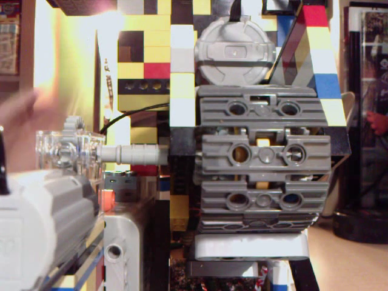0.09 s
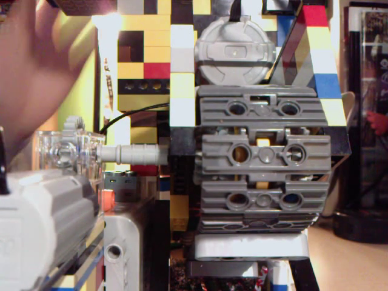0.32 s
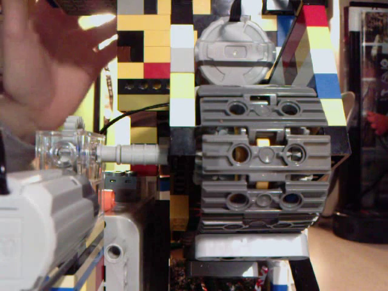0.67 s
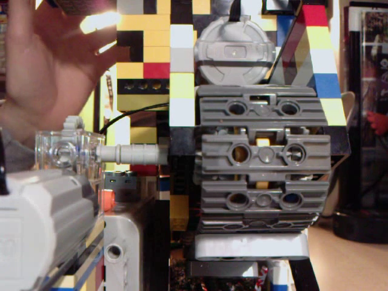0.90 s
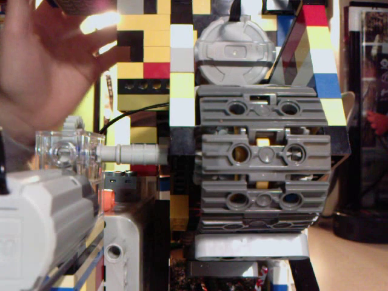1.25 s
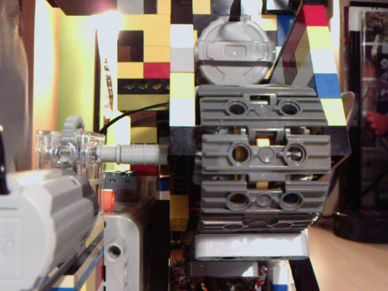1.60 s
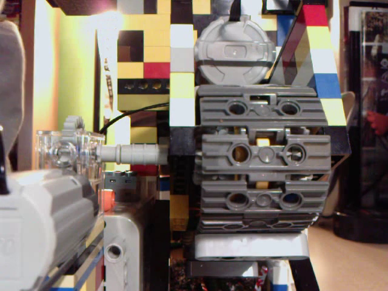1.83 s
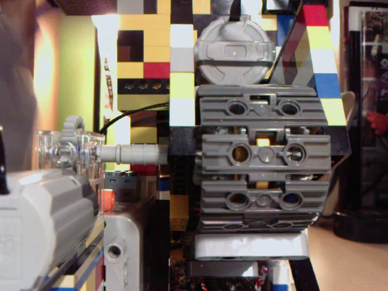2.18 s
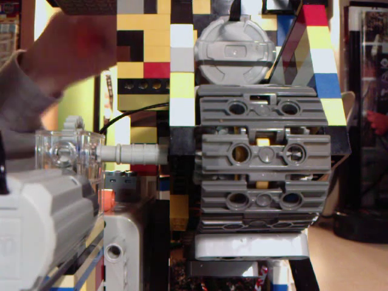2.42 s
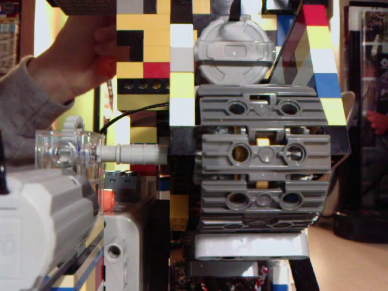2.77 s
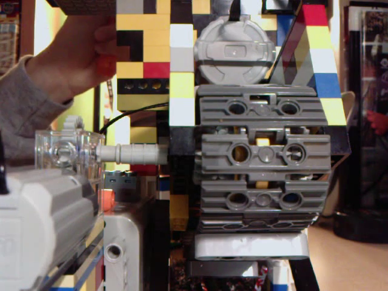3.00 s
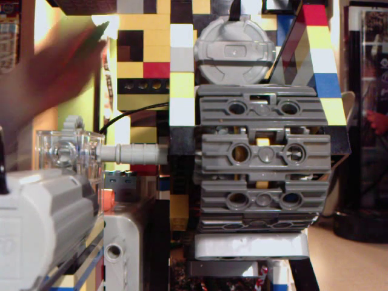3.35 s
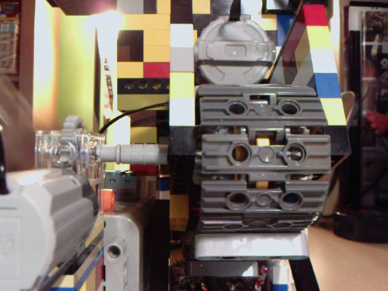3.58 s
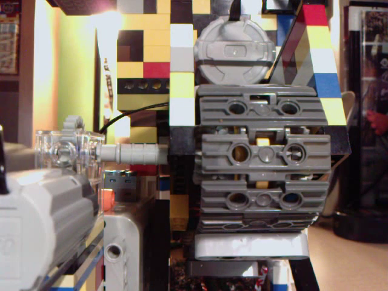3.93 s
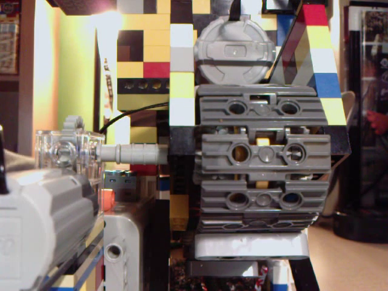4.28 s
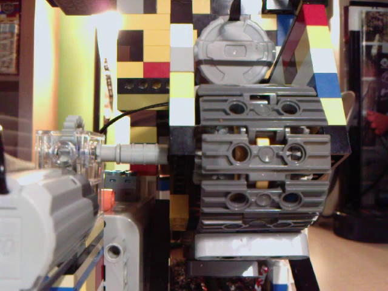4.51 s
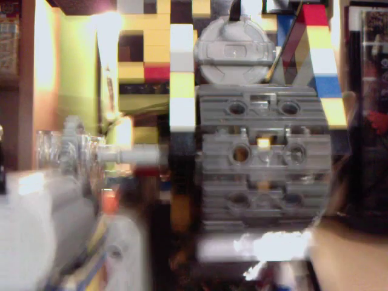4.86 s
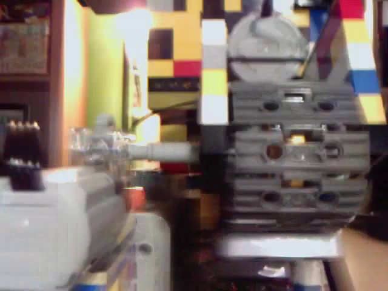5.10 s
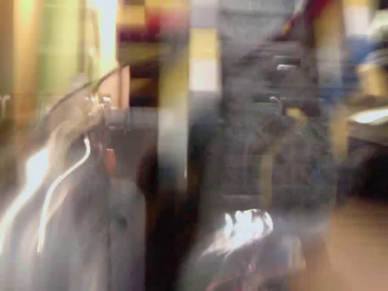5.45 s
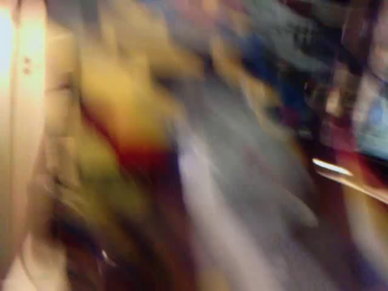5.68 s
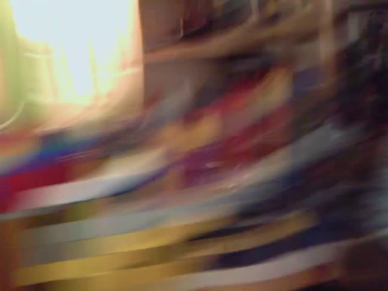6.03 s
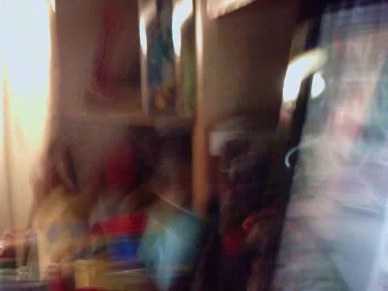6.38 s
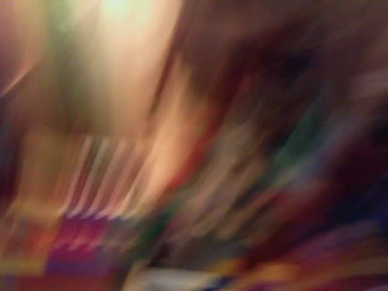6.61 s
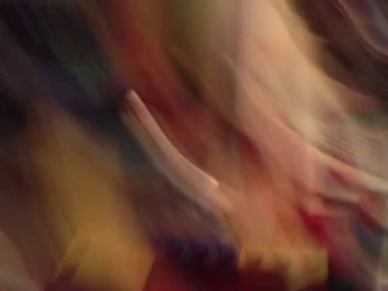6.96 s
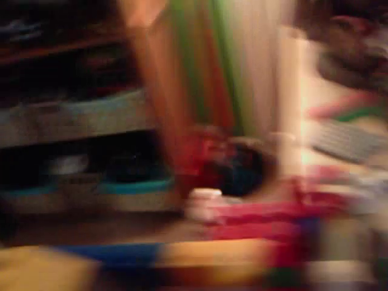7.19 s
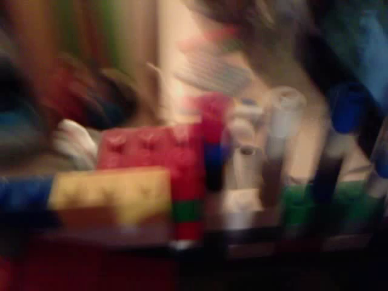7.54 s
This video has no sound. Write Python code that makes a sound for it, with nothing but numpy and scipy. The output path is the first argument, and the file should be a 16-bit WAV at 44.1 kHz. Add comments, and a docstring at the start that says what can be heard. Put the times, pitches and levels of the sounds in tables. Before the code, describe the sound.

Plastic toy bricks click and squeak, a small part drops, then comes loud clattering microphone handling, over a faint indoor hum.

```python
"""Handling a toy brick machine

The microphone sits in a model of plastic bricks. Fingers tap and bump the frame, joints slide and
squeak, and a loose part drops and rattles. Then the microphone is pulled out of its brick mount in an
overloading clatter and carried off. Behind it: mains hum, a thin whine and dull knocks in a small room."""
import sys
import numpy as np
from scipy import signal
from scipy.fft import rfft, irfft
from scipy.io import wavfile

SR = 44100
rng = np.random.default_rng(int(sys.argv[2]) if len(sys.argv) > 2 else 0)


def unload_audio(sound):
    """Save the sound as a 16-bit wav file, at the path given as the first command line argument."""
    columns = np.transpose(np.atleast_2d(sound))
    # keep every value between -1 and 1, then stretch to whole-number steps
    steps = np.round(np.clip(columns, -1, 1) * 32767)
    wavfile.write(sys.argv[1], SR, steps.astype(np.int16))


N = 342650
TIME = np.arange(N) / SR
HIT_TIME = TIME[:SR // 5]


def amp(db):
    """Decibels to gain."""
    return 10 ** (np.asarray(db) / 20)


def unit(x):
    """Scale to rms 1."""
    return x / np.sqrt(np.mean(x ** 2))


def fade(t, t60_s):
    """Exponential decay, 60 dB down after t60_s."""
    return np.exp(-np.log(1000) * t / t60_s)


def add(track, start_s, sound):
    """Mix a sound in at start_s."""
    i = max(int(start_s * SR), 0)
    track[i:i + len(sound)] += sound[:N - i]


def band(x, hz, kind, order=3):
    """Butterworth filter."""
    return signal.sosfilt(signal.butter(order, hz, kind, fs=SR, output="sos"), x)


def coloured_noise(samples, spectrum):
    """Noise of rms 1, shaped by (freq_hz, level_db) rows."""
    hz, db = np.transpose(spectrum)
    bins_hz = np.maximum(np.fft.rfftfreq(samples, 1 / SR), 1)
    gain = amp(np.interp(np.log(bins_hz), np.log(hz), db))
    return unit(irfft(rfft(rng.standard_normal(samples)) * gain, samples))


def walk(rate_hz):
    """Random wander with a spread near 1."""
    return np.interp(TIME * rate_hz, np.arange(1000), rng.standard_normal(1000))


def burst(band_hz, t60_s, order=2):
    """A dying band of noise."""
    return band(rng.standard_normal(len(HIT_TIME)), band_hz, "band", order) * fade(HIT_TIME, t60_s)


def stroke(start_s, length_s, attack_s, release_t60_s):
    """Envelope of a hand movement: rise, hold, decay."""
    attack = np.clip((TIME - start_s) / attack_s, 0, 1)
    return attack * fade(np.maximum(TIME - start_s - length_s, 0), release_t60_s)


def slips(per_s, spread_db):
    """Stick-slip: a random train of tiny jerks of wandering strength."""
    jerks = (rng.random(N) < per_s / SR) * rng.uniform(-0.9, 1, N)
    return jerks * amp(spread_db * np.tanh(walk(90)))


def ring(modes, scatter):
    """Struck modes; each point of contact weights and detunes them anew."""
    hz, db, t60_s = np.transpose(modes)[:, :, None]
    detune, weight, phase = rng.standard_normal((3, len(modes), 1))
    waves = np.sin(2 * np.pi * hz * (1 + scatter * detune) * HIT_TIME + np.pi * phase)
    return np.sum(amp(db + 2.3 * weight) * fade(HIT_TIME, t60_s) * waves, axis=0)


def strike(sound, body_db, shell_rel_db, crack_rel_db):
    """Set a blow's three band levels over its first 10 ms: hard corners are bright, flat faces dull."""
    body = band(sound, 2100, "low", order=5)
    shell = band(sound, [2200, 6200], "band", order=5)
    crack = band(sound, 6700, "high", order=5)
    parts = [(body, 0), (shell, shell_rel_db), (crack, crack_rel_db)]
    return sum(part * amp(body_db + rel_db) / np.std(part[:SR // 100]) for part, rel_db in parts)


def room(x, t60_s=0.16, damp_hz=3100):
    """Diffuse echo of a small furnished room, of unit energy."""
    t = TIME[:SR * 3 // 4]
    noise = band(rng.standard_normal(len(t)), damp_hz, "low", order=1)
    tail = noise * fade(t, t60_s) * (1 - fade(t, 0.034))
    return signal.fftconvolve(x, tail / np.linalg.norm(tail))[:N]


# Room noise spectrum: freq_hz, density_rel_db
AIR_SPECTRUM = [(25, 1), (90, 1.5), (150, -3), (300, -4.5), (400, -3), (520, -3.5), (680, -12.5),
                (900, -10), (1350, -11), (2050, -19.5), (2500, -22), (2900, -15), (3500, -24.5),
                (16000, -31)]


def room_air(level_db=-43):
    """Steady, dull noise of the room."""
    return amp(level_db) * coloured_noise(N, AIR_SPECTRUM)


# Hum tones: pitch_hz, rms_db
HUM_TONES = [(119.8, -47.5), (367, -54), (532, -57.5)]


def mains_hum(waver_hz=0.56, waver_db=0.59):
    """Three tones, wavering slightly in pitch and level."""
    out = np.zeros(N)
    for pitch_hz, rms_db in HUM_TONES:
        gain = amp(rms_db + waver_db * walk(7.5))
        phase = 2 * np.pi * np.cumsum(pitch_hz + waver_hz * walk(7.7)) / SR
        out += gain * unit(np.sin(phase))
    return out


def whine(pitch_hz=12796, pulse_hz=8.55):
    """Thin, pulsing tone of the electronics."""
    pulsing = np.clip(0.5 + np.sin(2 * np.pi * pulse_hz * TIME), 0, 1)
    level_db = np.interp(TIME, [0, 5.5, 6.1, 7.77], [-74, -72, -66, -68])
    return amp(level_db) * unit(pulsing * np.sin(2 * np.pi * pitch_hz * TIME))


# Distant scuffs and knocks: start_s, level_db, t60_s
FAR_KNOCKS = [(3.909, -20, 0.067), (3.925, -27, 0.12), (6.783, -23.5, 0.094), (6.824, -27.5, 0.15),
              (6.846, -18, 0.046), (7.136, -31, 0.29), (7.193, -37, 0.13), (7.24, -29, 0.18),
              (7.308, -32.5, 0.22), (7.454, -22, 0.14), (7.519, -25, 0.17), (7.532, -20, 0.084),
              (7.584, -31.5, 0.18)]
# Knock spectrum: freq_hz, density_rel_db
KNOCK_SPECTRUM = [(60, -24), (280, -2.5), (450, -11), (700, -6), (1250, 0), (2100, -14), (2900, -15),
                  (3800, -34.5), (7000, -44), (15000, -81)]


def far_knocks(rise_s=0.016):
    """Things nudged further off: dense, dull resonances that swell briefly and die."""
    out = np.zeros(N)
    for start_s, level_db, t60_s in FAR_KNOCKS:
        thump = coloured_noise(len(HIT_TIME), KNOCK_SPECTRUM)
        envelope = fade(HIT_TIME, t60_s) * (1 - fade(HIT_TIME, rise_s))
        add(out, start_s, amp(level_db) * thump * envelope)
    return out


# Finger grips: start_s, length_s, hiss_db, ticks_db
FINGER_GRIPS = [(0.518, .13, -61, -68), (2.2, .2, -74, -60), (2.478, 0.18, -65, -52.5),
                (5.64, 0.29, -46, -48), (5.902, 0.29, -63, -49), (6.362, .23, -53.5, -42),
                (6.701, 1.2, -68, -62.5)]


def finger_grips(attack_s=0.12, release_t60_s=0.37):
    """Fingers on the plastic give a grainy hiss and tiny creaking ticks."""
    hiss = unit(band(slips(per_s=3500, spread_db=2.2), [2800, 9000], "band", order=1))
    tick = band(burst([2200, 6500], t60_s=0.006), 6500, "low")
    ticks = unit(signal.fftconvolve(slips(per_s=62, spread_db=13), tick)[:N])
    out = np.zeros(N)
    for start_s, length_s, hiss_db, ticks_db in FINGER_GRIPS:
        envelope = stroke(start_s, length_s, attack_s, release_t60_s)
        out += (amp(hiss_db) * hiss + amp(ticks_db) * ticks) * envelope
    return out


# Low modes of the frame on its table: freq_hz, level_rel_db, free_t60_s
FRAME_MODES = [(69, -6, 0.76), (113, 10, 0.49), (171, 6.5, 0.18), (219.5, 11, 0.1), (267, 10, 0.11),
               (331.5, 2.5, 0.58), (478, -8, 0.15)]
# Pushes on the frame: start_s, level_db, tilt_db_per_octave, t60_ratio
FRAME_BUMPS = [(0.653, -36.5, -7, 1), (0.9396, -14.5, -2.5, 0.37), (1.013, -25.5, -4.5, 0.51),
               (1.272, -34.5, 1, 1), (2.678, -24, 8, 0.76), (2.902, -37.5, 0, 0.35), (3.03, -33.5, 1, 0.39),
               (3.095, -29, -4, 0.46), (5.07, -28.5, -10, 0.27), (5.156, -23, 6.5, 0.39),
               (5.299, -29, 7, 1), (5.484, -28.5, -11, 0.13), (7.159, -34, -9, 0.46),
               (7.209, -31, -10, 0.5)]


def frame_bumps():
    """A push rocks the frame; a short push rings the upper modes, and a firm grip damps them all."""
    out = np.zeros(N)
    hz, mode_db, free_t60_s = np.transpose(FRAME_MODES)[:, :, None]
    waves = np.sin(2 * np.pi * hz * HIT_TIME)
    release = np.minimum(1, (HIT_TIME[-1] - HIT_TIME) / 0.05)
    for start_s, level_db, tilt_db_per_octave, t60_ratio in FRAME_BUMPS:
        gains = amp(mode_db + tilt_db_per_octave * np.log2(hz))
        thud = np.sum(gains * fade(HIT_TIME, free_t60_s * t60_ratio) * waves, axis=0)
        add(out, start_s, amp(level_db) * release * thud / np.std(thud[:SR // 30]))
    return band(out, 46, "high", order=4)


# Tight joints turning: middle_s, length_s, pitch_hz, level_db
JOINT_SQUEAKS = [(0.585, 0.038, 1180, -27.5), (0.595, 0.095, 722, -36), (0.622, 0.018, 1190, -27),
                 (0.626, 0.08, 1355, -34), (0.848, 0.03, 1400, -37), (1.276, 0.021, 1312, -11.5),
                 (2.565, 0.042, 1345, -32.5), (5.974, 0.014, 650, -26.5), (6.042, 0.017, 652, -33.5),
                 (6.105, 0.017, 662, -32), (6.842, 0.039, 634, -26.5)]


def joint_squeaks(pitch_waver=0.016, waver_db=2.5):
    """Friction locks on to one mode of the plastic for a moment, unsteadily."""
    out = np.zeros(N)
    for middle_s, length_s, pitch_hz, level_db in JOINT_SQUEAKS:
        swell = np.exp(-(2.5 * (TIME - middle_s) / length_s) ** 2)
        gain = amp(level_db + waver_db * walk(120))
        phase = 2 * np.pi * np.cumsum(pitch_hz * (1 + pitch_waver * walk(120))) / SR
        out += gain * swell * np.sin(phase)
    return out


# Modes of the loose part: freq_hz, level_rel_db, t60_s
PART_MODES = [(804, -3, 0.021), (1044, -4.5, 0.034), (1312, 4.5, 0.02), (1670, -2, 0.034), (2864, 6, 0.042),
              (3056, 10.5, 0.021), (4250, -6, 0.033), (6780, 14, 0.012), (7270, 16, 0.029),
              (8870, 3.5, 0.033), (14600, -18, .015)]
# Its bounces: start_s, body_db, shell_rel_db, crack_rel_db
PART_BOUNCES = [(4.1258, -35, -5.5, -16), (4.1503, -29, -4, -9), (4.1958, -34, -1, -10),
                (4.2243, -41.5, 4, 1), (4.246, -26.5, -9, -11), (4.2636, -39, -1, 0),
                (4.275, -28.5, -3, -1), (4.295, -18.5, -8, -7), (4.2984, -17, 2, 0),
                (4.3134, -24.5, 6.5, 5), (4.3348, -29.5, 6.5, 3), (4.3509, -23, -4.5, -6),
                (4.392, -26.5, -0.5, 0.5), (4.4135, -32, -7, -21), (4.4705, -33, -4, 8.5),
                (4.4941, -38.5, -4, 5.5)]


def loose_part(snap_db=11, rise_s=0.006):
    """A small hard part skitters and bounces with a bright, pitched tinkle."""
    out = np.zeros(N)
    for start_s, *levels_db in PART_BOUNCES:
        snap = amp(snap_db) * burst([600, 6000], t60_s=0.041, order=1)
        tinkle = ring(PART_MODES, scatter=0.015)
        blow = band(tinkle + snap, 570, "high") * (1 - fade(HIT_TIME, rise_s))
        add(out, start_s - 0.001, strike(blow, *levels_db))
    return out


# Modes of the brick mount: freq_hz, level_rel_db, t60_s
MOUNT_MODES = [(594, -24, 0.025), (791, -13.5, 0.022), (891, -21, 0.048), (1153, -0.5, 0.024),
               (1507, 2, 0.02), (1934, -8, 0.022), (2493, -1, 0.021), (2888, 0.5, 0.03), (3346, -1.5, 0.01),
               (4194, 8, 0.0076), (4814, -5.5, 0.023), (6450, 7, 0.0062), (7320, -7, 0.022),
               (8200, -39, 0.017), (9400, -32, .012)]
# Plastic sliding on plastic: start_s, length_s, level_db
BRICK_SLIDES = [(0.0, 0.032, -27.5), (0.553, .1, -44), (0.851, 0.058, -40.5), (0.938, .1, -36),
                (1.244, 0.055, -31), (2.546, 0.021, -38.5), (2.631, 0.072, -38.5), (3.014, 0.027, -39.5),
                (4.993, 0.049, -19), (5.069, .135, -20), (5.283, .07, -16), (5.359, 0.039, -21),
                (5.424, .38, -37.5), (5.818, .16, -33.5), (5.998, 0.13, -45), (6.422, 0.51, -49.5),
                (6.97, 0.071, -45.5), (7.4, .37, -51)]


def brick_slides(attack_s=0.0058, release_t60_s=0.094):
    """Stick-slip between bricks softly excites the mount's modes, damped to a third of their ring time."""
    mount = sum(amp(db) * fade(HIT_TIME, t60_s / 3) * np.cos(2 * np.pi * hz * HIT_TIME)
                for hz, db, t60_s in MOUNT_MODES)
    friction = signal.fftconvolve(slips(per_s=5000, spread_db=11.4), mount)[:N]
    effort = sum(amp(level_db) * stroke(start_s, length_s, attack_s, release_t60_s)
                 for start_s, length_s, level_db in BRICK_SLIDES)
    return unit(band(friction, [700, 2400], "band")) * effort


def stud_catches(per_s=33, spread_db=3.5, shell_rel_db=-14, crack_rel_db=-17, centre_hz=1384):
    """Yield the light contacts of studs catching at random during each slide."""
    for start_s, length_s, level_db in BRICK_SLIDES:
        count = int(length_s * per_s)
        for k, (jitter, force, detune) in enumerate(rng.uniform(-1, 1, (count, 3))):
            catch_s = start_s + length_s * (k + 0.5 + jitter / 2) / count
            body_db = level_db + 0.5 + spread_db * force
            yield catch_s, body_db, shell_rel_db, crack_rel_db, centre_hz * 2 ** (detune / 2)


# Bricks hitting the mount: start_s, body_db, shell_rel_db, crack_rel_db, pitch_hz, rebound_step_db
BRICK_HITS = [(0.0102, -23, -17, -24, 1260, -20), (0.0247, -17.5, -14.5, -15, 1180, -16),
              (0.789, -34, -17, -31, 1400, -15), (0.8669, -26, -25, -12.5, 1190, -10),
              (0.94, -15.5, -6, -11, 1140, -11), (0.9611, -24, -13, -16, 1780, -10),
              (1.011, -24, -28, -32, 1072, -17), (1.2707, -13.5, -23.5, -36, 1250, -19),
              (1.692, -49, 2, -13, 1190, -9), (2.199, -47.5, 1, 2.5, 1820, -10),
              (2.3464, -40.5, -8, -15, 1270, -6), (2.6775, -18, -24, -27, 1207, -18),
              (3.038, -32.5, -15, -29, 1350, -17), (3.158, -41.5, -24, -27, 1070, -12),
              (4.9845, 0, -8, -13.5, 1250, -18), (5.0242, -15, -4, -20, 1585, -11),
              (5.051, -26.5, 1.5, -13, 1390, -9), (5.0834, -4.5, -0.5, -16, 1850, -8),
              (5.1116, -15.5, -11, -24, 1670, -20), (5.1233, -8, -4, -15, 1460, -29),
              (5.1365, -18, 3, -12, 1280, -27), (5.1549, 6, -20, -28, 877, -10.5),
              (5.1596, 3.5, -7.5, -18, 1115, -14), (5.1717, -11, 2, -15, 1600, -4),
              (5.2014, -9.5, -9, -25, 1164, -25), (5.2196, -18, 2.5, -13, 1520, -30),
              (5.261, -25, -6, -29, 1520, -8), (5.2935, -23, 1, -16, 1781, -6),
              (5.3156, -9.5, -0.5, -5, 1470, -4.5), (5.3345, -8.5, -4, -22, 1143, -16),
              (5.3431, -17.5, 4, -12, 1065, -12), (5.3697, -9, -4.5, -23, 1520, -5.5),
              (5.47, -18, 0.5, -25, 1750, -24), (5.4802, -8, 0.5, -25, 998, -8),
              (5.487, -5.5, -2, -5.5, 1170, -8.5), (5.5225, -12, -15, -34, 1160, -25),
              (5.5457, -20, 5, -8, 1490, -22), (5.5608, -16, -1, -20, 1486, -7),
              (5.5658, -20, -2, -28, 1560, -14), (5.6091, -8.5, -5.5, -29, 1528, -26),
              (5.6158, -23, 5.5, 2, 1410, -30), (5.6372, -24, -15, -8, 1370, -15),
              (5.645, -15, -6.5, -25, 1470, -5), (5.7403, -15.5, -4.5, -30, 970, -9),
              (5.7493, -11, -4, -35, 1140, -12), (5.789, -29.5, -12, -26, 1520, -20),
              (5.9065, -19, -17, -21, 1217, -16), (5.9154, -22, -7, -30, 1664, -10),
              (5.9373, -24.5, -6, -13.5, 1370, -6.5), (6.099, -33.5, -20, -35, 1357, -20),
              (6.2779, -20, -8, -28, 1730, -22), (6.2865, -19, -6, -13.5, 1630, -21),
              (6.3234, -11, 0.5, -16.5, 1476, -16), (6.38, -20.5, -11, -23, 1680, -11.5),
              (6.4069, -13.5, -13, -35, 1150, -20), (6.4238, -19, -10, -24, 1460, -24),
              (6.4397, -25, -15, -29, 1550, -3), (6.6389, -16, 0.5, -29, 1392, -4),
              (6.6469, -18.5, -18, -25, 1173, -4), (6.6705, -16, -20, -37, 1138, -22),
              (6.7244, -26.5, -20, -38, 1200, -21), (6.7878, -22, -25, -28, 1370, -13),
              (6.8003, -20.5, -21, -35, 1136, -2.5), (7.0819, -33, -17, -31, 1150, -5)]


def brick_hits(count=3, first_gap_s=0.0098, gap_ratio=0.9, crack_step_db=-6):
    """Yield the contacts of each hit and its rebounds, each sooner, softer and duller."""
    for start_s, body_db, shell_rel_db, crack_rel_db, pitch_hz, rebound_step_db in BRICK_HITS:
        detune = np.exp(0.1 * rng.standard_normal(count))
        detune[0] = 1
        for k in range(count):
            yield start_s, body_db, shell_rel_db, crack_rel_db, pitch_hz * detune[k]
            start_s += first_gap_s * gap_ratio ** k
            body_db += rebound_step_db
            crack_rel_db += crack_step_db


def brick_clatter(contacts, brick_db=2, chatter_db=1, snap_db=9, retouch_db=3, snap_t60_s=0.0042):
    """Each contact snaps twice, 1-3 ms apart, rings brick and mount, and shakes the loose joints."""
    out = np.zeros(N)
    build_up = 1 - fade(HIT_TIME, 0.005)
    for start_s, *levels_db, pitch_hz in contacts:
        brick = amp(brick_db) * np.sin(2 * np.pi * pitch_hz * HIT_TIME) * fade(HIT_TIME, t60_s=0.033)
        mount = ring(MOUNT_MODES, scatter=0.04)
        chatter = amp(chatter_db) * burst([500, 4800], t60_s=0.036)
        snap = amp(snap_db) * burst([500, 5600], snap_t60_s)
        lag_samples = int(SR * rng.uniform(0.001, 0.003))
        retouch = amp(retouch_db) * np.roll(burst([600, 4800], snap_t60_s), lag_samples)
        blow = snap + retouch + (brick + mount + chatter) * build_up
        add(out, start_s, strike(blow, *levels_db))
    return out


def scene():
    """Blows on the mount come straight through the plastic; the loose part and knocks carry more room."""
    near = brick_clatter([*brick_hits(), *stud_catches()]) + joint_squeaks()
    part = loose_part()
    far = far_knocks()
    echo = room(amp(-28.5) * near + amp(-7) * part + amp(-19) * far)
    handling = frame_bumps() + brick_slides() + finger_grips()
    background = room_air() + mains_hum() + whine()
    return (near + part + far + echo + handling + background)[None]


def record(dry, sag_db=-16.5, sag_band_hz=(24, 166), top_hz=15900):
    """The input clips on the loudest clicks and sags with a low thump on overload; the top is cut."""
    overload = (np.abs(dry) > 1).astype(float)
    sag = amp(sag_db) * band(overload, sag_band_hz, "band", order=2)
    lowpass = signal.ellip(8, 0.2, 60, top_hz, fs=SR, output="sos")
    return signal.sosfilt(lowpass, np.clip(dry, -1, 1) - sag)


dry = scene()
out = record(dry)
unload_audio(out)
```